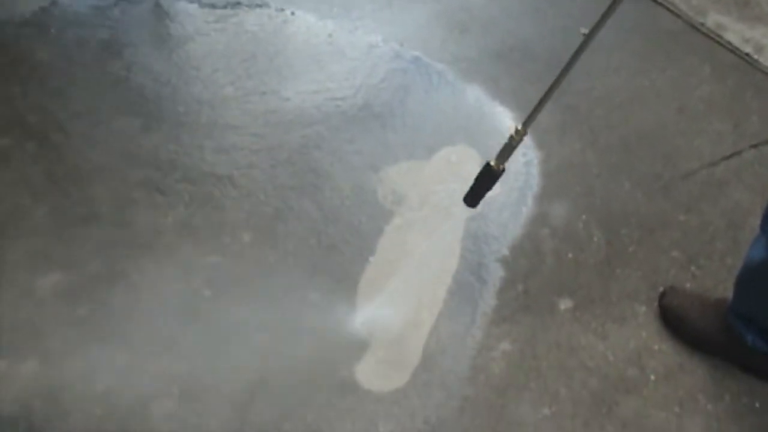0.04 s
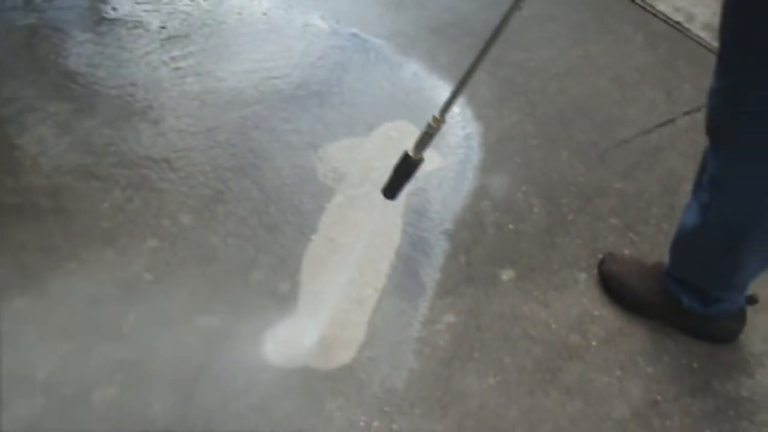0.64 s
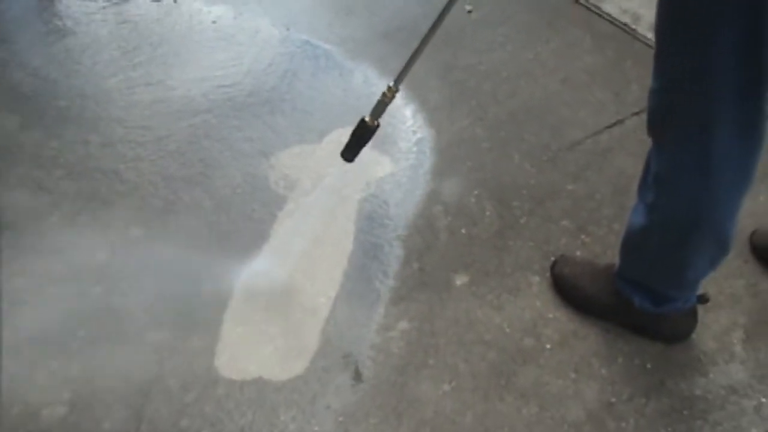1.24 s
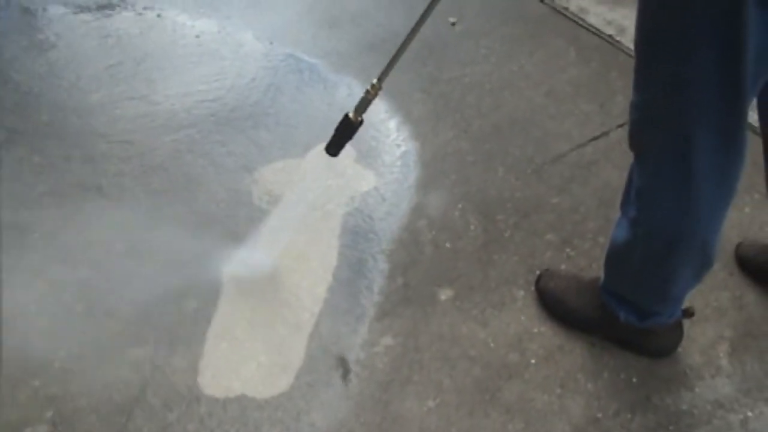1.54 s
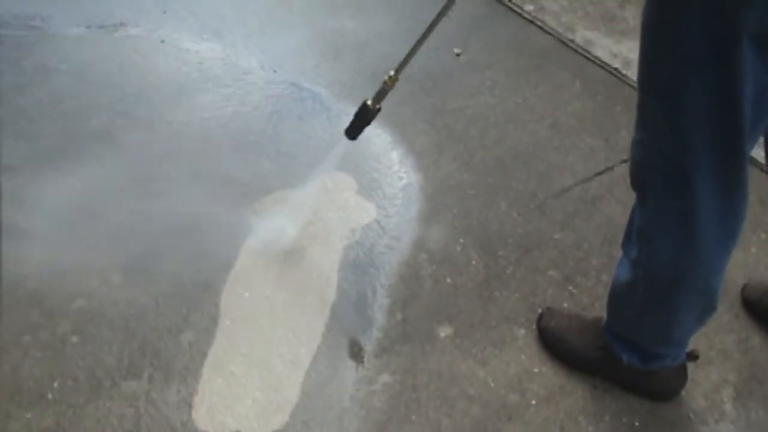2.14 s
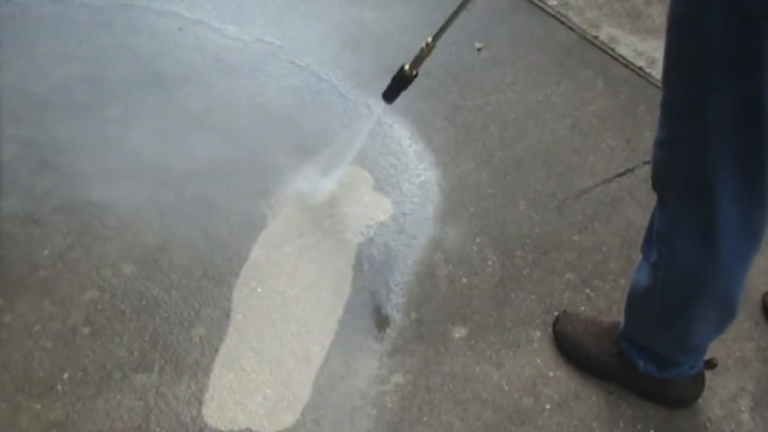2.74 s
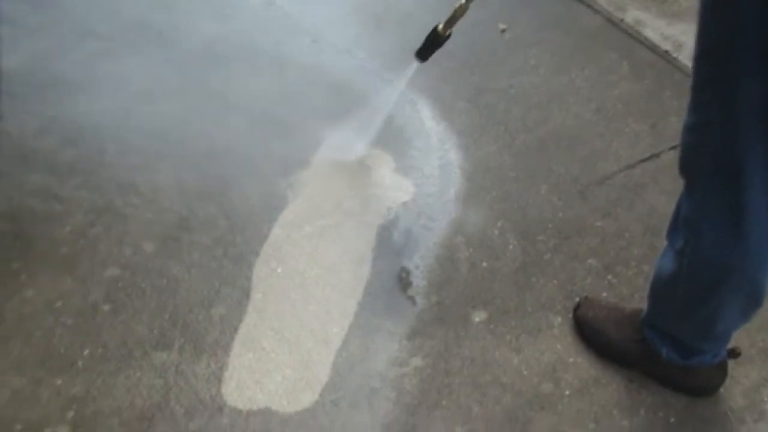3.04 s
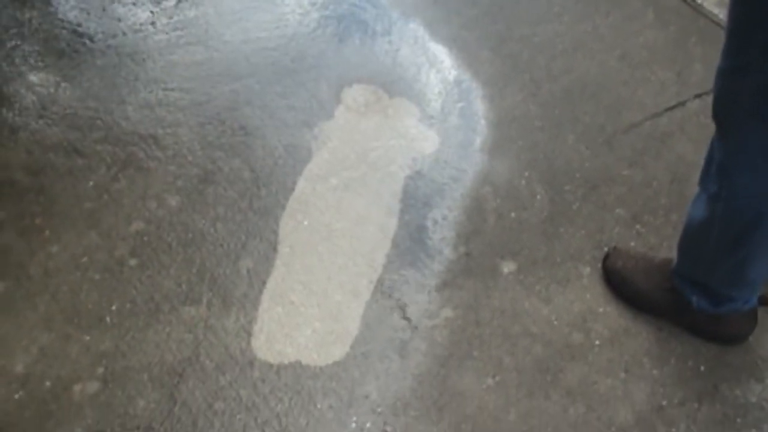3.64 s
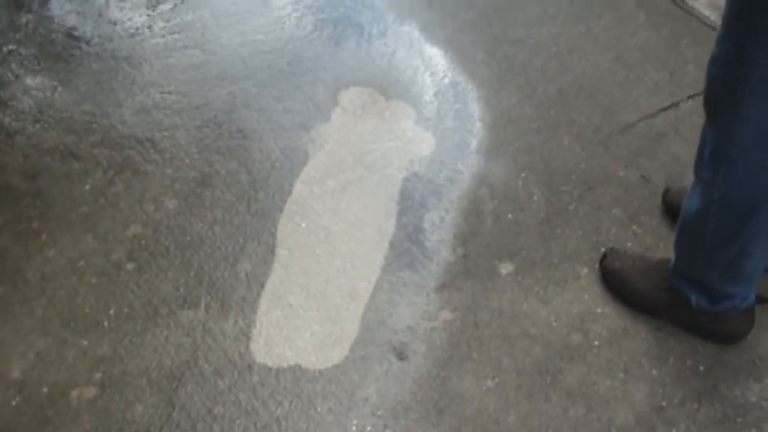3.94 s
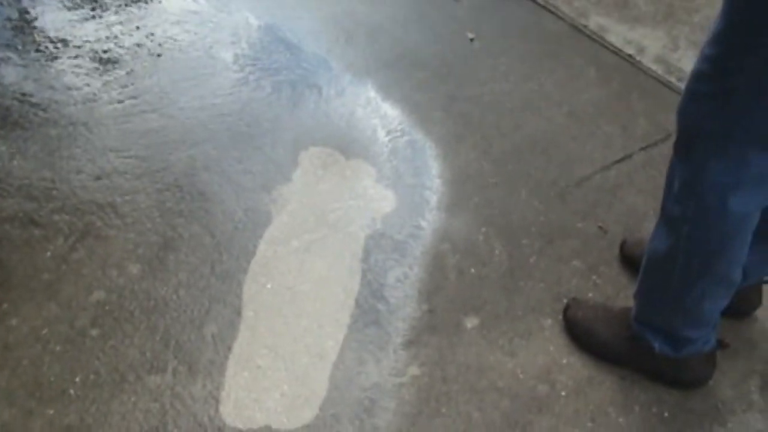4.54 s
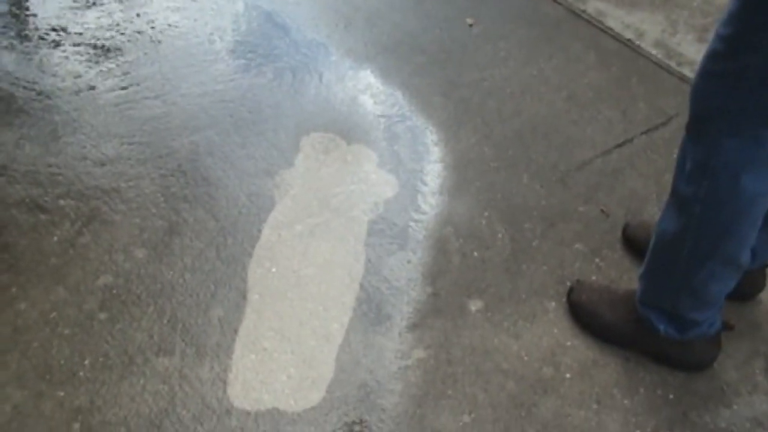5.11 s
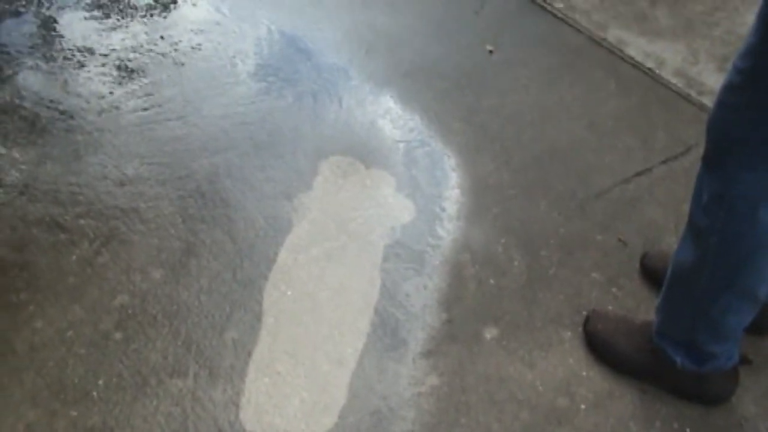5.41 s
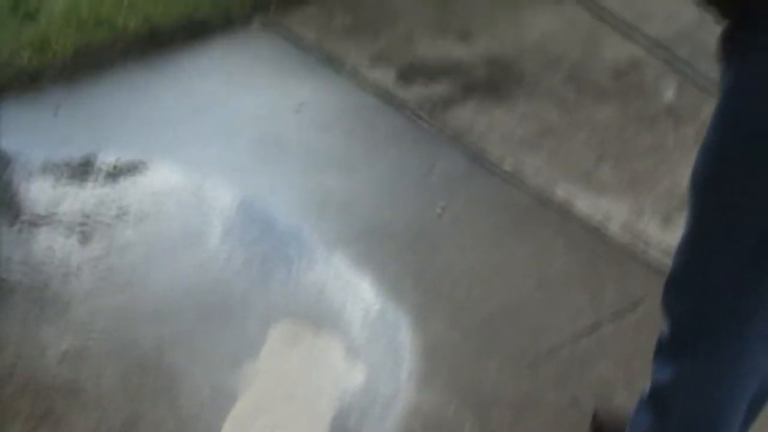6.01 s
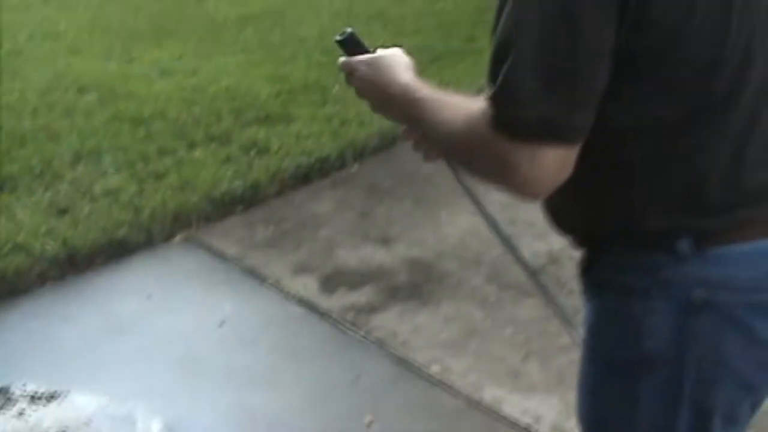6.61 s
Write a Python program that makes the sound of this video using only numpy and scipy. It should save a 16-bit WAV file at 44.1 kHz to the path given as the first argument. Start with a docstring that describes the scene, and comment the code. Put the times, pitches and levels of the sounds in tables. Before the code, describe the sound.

A pressure washer hisses loudly on concrete, then cuts off, leaving a quiet, low engine idle that slowly grows louder.

```python
"""A concrete driveway, blasted by a pressure washer at arm's length. Bright nozzle hiss throbs with the
pump over the spatter and drumming of drops; the slab's reflection sweeps the colour as the lance lifts.
The trigger is let go and the jet stops dead, leaving a faint ringing. Some way off the unloaded
single-cylinder engine hunts, beating against a steady drone. It swells as the automatic gain recovers
and the microphone turns towards it. A faint high whine, probably the camera's own, lies underneath."""
import sys
import numpy as np
from scipy import signal
from scipy.fft import rfft, irfft, next_fast_len
from scipy.io import wavfile
from scipy.ndimage import uniform_filter1d, map_coordinates

SR = 44100
rng = np.random.default_rng(int(sys.argv[2]) if len(sys.argv) > 2 else 0)


def to_wav(s):
    """Save 16-bit WAV."""
    ch = np.atleast_2d(s).T  # columns
    pcm = np.round(np.clip(ch, -1, 1) * 32767)  # PCM
    wavfile.write(sys.argv[1], SR, pcm.astype(np.int16))


N = 302967
TIME = np.arange(N) / SR
RELEASE_S = 3.266   # trigger let go
SINCE_RELEASE_S = np.maximum(TIME - RELEASE_S, 0)
LOADED_HZ, IDLE_HZ = 29.05, 30.4   # engine firing rates
LATE_RISE_DB = 2 * np.maximum(TIME - 4.55, 0)

# Stereo image of the spray. Each row: frequency in Hz, left-right correlation.
SPRAY_CORRELATION = [(60, 0.69), (150, 0.39), (380, 0.67), (700, 0.43), (1300, 0.77), (2000, 0.74),
                     (2800, 0.95), (4400, 0.99), (6500, 0.94), (9500, 1), (12300, 0.98), (14200, 0.74)]
# Balance of the spray. Each row: frequency in Hz, left minus right in dB.
SPRAY_PAN = [(180, -1.8), (400, -0.5), (850, -3), (2000, -1.3), (2800, -0.5), (4200, 0), (6200, -3.5),
             (9000, 0), (13400, -0.9), (15000, -3)]
# Stereo image of clatter and lingering hiss. Each row: frequency in Hz, left-right correlation.
FAR_CORRELATION = [(100, 0.92), (300, 0.88), (640, 0.86), (1400, 0.72), (3100, 0.76), (6800, .63),
                   (15000, .15)]


def jet(pump_hz=42.94, wander_hz=1.85, shutoff_s=.0038):
    """Hiss, spatter and drumming pulse with the pump's pressure until the valve shuts."""
    # The lance is drawn back and up. Each row: time in seconds, lift from 0 (lowest) to 1 (highest).
    lance_path = [(0, .45), (.3, .12), (.55, 0), (.8, .07), (1.3, .47), (1.6, .61), (2.2, .76), (2.55, .9),
                  (3.25, 1)]
    lift = in_time(lance_path)
    stroke_rad = 2 * np.pi * np.cumsum(pump_hz + wander_hz * drift(4.3)) / SR
    pressure = np.sin(stroke_rad) * (1 + .23 * drift(4.7))
    hiss = nozzle_hiss(stroke_rad, pressure, lift)
    impact = from_db(.9 * pressure + .6 * drift(59.3))
    valve = np.exp(-SINCE_RELEASE_S / shutoff_s)
    return valve * (hiss + spatter(impact, lift) + drumming(impact, pressure, lift))


def nozzle_hiss(stroke_rad, pressure, lift, level_db=-15.5, lift_loss_db=1.76):
    """Bright noise from the nozzle, throbbing at the pump rate and its double."""
    # Hiss spectrum. Each row: frequency in Hz, relative density in dB.
    spectrum = [(2500, -35.5), (3800, -14), (4450, -5.5), (5300, -4), (6600, -3), (8300, -3.3), (9500, -1),
                (10800, 1.3), (12000, -2), (13200, -3.5), (14300, -5.5), (15700, -7.5)]
    throb_db = 1.01 * pressure + .7 * np.sin(2 * stroke_rad) + .5 * drift(150)
    hiss = coloured(white(), spectrum, SPRAY_CORRELATION, SPRAY_PAN)
    hiss *= from_db(level_db - lift_loss_db * lift + throb_db)
    return slab_reflection(hiss, lift, detour_m=.178, lift_detour_m=.031, shares=(.4, .045))


def spatter(impact, lift, level_db=-28, lift_loss_db=2.5):
    """A dense rain of drops hits the concrete."""
    # Spatter spectrum. Each row: frequency in Hz, relative density in dB.
    spectrum = [(20, -14), (40, -6), (75, -6.5), (160, -4.5), (280, -4), (700, 0.9), (1150, 1.4),
                (1550, 0.8), (2050, 0.5), (2700, 1.9), (3300, -0.1), (4300, -2), (6500, -10)]
    hits = coloured(drops(per_s=14000), spectrum, SPRAY_CORRELATION, SPRAY_PAN)
    hits *= from_db(level_db - lift_loss_db * lift) * impact
    return slab_reflection(hits, lift, detour_m=.173, lift_detour_m=.063, shares=(.11, .39))


def drumming(impact, pressure, lift, note_hz=374, level_db=-35, lift_loss_db=11.5, thump_db=-55):
    """The biggest slugs of water drum a hollow note on the slab; each pump stroke thumps it."""
    blows = resonate(stereo(*drops(per_s=3500), .87), note_hz, width_hz=170)
    note = unit_rms(resonate(blows, note_hz, width_hz=400))
    thump = from_db(thump_db + 2 * drift(10)) * pressure
    return from_db(level_db - lift_loss_db * lift ** 2) * impact * note + thump


def drops(per_s):
    """Two streams of impacts, random in time and size."""
    return (rng.random((2, N)) < per_s / SR) * white()


def slab_reflection(x, lift, detour_m, lift_detour_m, shares, sound_m_per_s=343):
    """Add the echo off the concrete; shares gives its strength at lowest and highest lift."""
    delay_samples = (detour_m + lift_detour_m * lift) / sound_m_per_s * SR
    share = np.interp(lift, [0, 1], shares)
    echo = np.array([map_coordinates(side, [np.arange(N) - delay_samples], order=3) for side in x])
    return (x + share * echo) / np.sqrt(1 + share ** 2)


def engine():
    """Exhaust and clatter follow one crank; both grow as the microphone turns towards them."""
    speed_hz, throttle = governor()
    load = np.exp(-SINCE_RELEASE_S / .2)
    firing_rad = 2 * np.pi * np.cumsum(speed_hz + .044 * drift(11.2)) / SR
    low = panned(exhaust(firing_rad, speed_hz, throttle, load), pan_db=1.5)
    return from_db(LATE_RISE_DB) * (low + clatter(firing_rad, throttle, load))


def governor(pickup_s=.19, lag_s=.1, half_open_s=.16):
    """Firing rate in Hz and throttle opening: each blip lifts the speed, then it coasts down."""
    # Throttle blips. Each row: start in seconds, swing either side of idle in Hz.
    blips = [(3.42, 1.25), (4.0, 1.05), (4.68, .7), (5.33, .6), (6.08, .55), (6.82, .55)]
    speeds = [(RELEASE_S, LOADED_HZ)]
    for start_s, swing_hz in blips:
        speeds += [(start_s, IDLE_HZ - swing_hz), (start_s + pickup_s, IDLE_HZ + swing_hz)]
    throttle = sum(np.exp(-((TIME - start_s - lag_s) / half_open_s) ** 2) for start_s, _ in blips)
    return in_time(speeds), throttle


def exhaust(firing_rad, speed_hz, throttle, load, puff_db=-56.5, rumble_db=-60.5, boom_order=4):
    """One uneven puff per firing, over a low rumble; the muffler booms more as speed rises."""
    # Exhaust harmonics. Each row: multiple of the firing rate, relative level in dB.
    harmonics = [(1, -15), (2, -3.5), (3, -9), (5, -5), (6, -4.5), (7, -7.5), (8, -11), (9, -19), (10, -15),
                 (11, -15), (12, -13), (13, -15), (16, -7.5), (18, -17), (20, -17)]
    smear_rad = .35   # the muffler delays the higher orders
    puffs = sum(from_db(db) * (1 + .22 * drift(10)) * np.cos(k * firing_rad - smear_rad * k * k)
                for k, db in harmonics)
    puffs = from_db(puff_db + 2.5 * throttle + .71 * drift(25)) * unit_rms(puffs)
    choke_db = 5 * np.maximum(throttle, load)
    boom_db = -55.5 + 4 * (speed_hz - IDLE_HZ) - choke_db
    boom = from_db(boom_db) * unit_rms(np.cos(boom_order * firing_rad - smear_rad * boom_order ** 2))
    rumble = from_db(rumble_db) * noise_band(stereo(*white(), .83), hz=99, width_hz=143)
    return puffs + boom + rumble


def clatter(firing_rad, throttle, load, level_db=-53, load_db=4.5):
    """Valves and fan clatter in step with the crank, and engine parts sing."""
    # Clatter spectrum. Each row: frequency in Hz, relative density in dB.
    spectrum = [(130, -7.5), (260, -4.5), (350, -3), (450, -4), (720, -4), (1050, -6), (1450, -6),
                (2000, -9), (2500, -10), (2900, -12.5), (4100, -13.5), (5000, -16.5), (6300, -24.5),
                (9000, -30), (15700, -39.5)]
    # Clatter balance. Each row: frequency in Hz, left minus right in dB.
    balance = [(200, 1), (900, 0), (1700, -4.6), (3300, -5.5), (5000, -4.8), (11000, -0.5)]
    # Casing resonances. Each row: frequency in Hz, width in Hz, level in dB relative to the clatter.
    casing_modes = [(2243, 120, -14.5), (3890, 380, -21.5)]
    knock_db = -.35 * (np.cos(firing_rad) + np.cos(2 * firing_rad))
    knock = from_db(knock_db + .52 * drift(40) + .5 * throttle)
    rattle = coloured(white(), spectrum, FAR_CORRELATION, balance)
    casing = panned(singing(casing_modes), pan_db=-2.5)
    return from_db(level_db + load_db * load) * knock * (rattle + casing)


def yard_echoes(x, t60_s=.48, gap_s=.004, lowpass_hz=7530):
    """Diffuse echoes from house and fence, different at each ear."""
    t = TIME[:SR]
    tail = rng.standard_normal((2, SR)) * from_db(-60 * t / t60_s) * (t > gap_s)
    tail = stereo(*tail, .87)
    tail /= np.sqrt(np.sum(tail ** 2) / 2)
    lowpass = signal.butter(1, lowpass_hz, fs=SR, output="sos")
    return signal.sosfilt(lowpass, signal.fftconvolve(x, tail, axes=1)[:, :N])


def ringing(hiss_db=-58, fade_db_per_s=8.5):
    """Soft hiss with thin high tones, dying slowly once the jet stops."""
    # Lingering hiss. Each row: frequency in Hz, relative density in dB.
    spectrum = [(3000, -8), (5500, -2), (7000, 1), (9500, 0.8), (11500, 0), (12400, -5.5), (14000, -3),
                (15700, -3)]
    # Thin tones. Each row: frequency in Hz, width in Hz, level in dB.
    tones = [(2550, 200, -66), (8470, 45, -73), (9000, 130, -72), (10480, 120, -76), (10880, 130, -71.5),
             (11660, 150, -74), (12960, 170, -76.5), (14980, 150, -79)]
    hiss = from_db(hiss_db) * coloured(white(), spectrum, FAR_CORRELATION)
    return (hiss + singing(tones)) * from_db(-fade_db_per_s * SINCE_RELEASE_S)


def drone(base_hz=29.01, roughness=.23):
    """A steady low drone, like another motor farther off."""
    # Drone partials. Each row: multiple of base_hz, level in dB.
    partials = [(2, -62.5), (4, -69), (5, -66), (6, -70), (10, -72), (12, -67.5), (15, -77)]
    phase_rad = 2 * np.pi * base_hz * TIME
    return sum(from_db(db) * unit_rms((1 + roughness * drift(6)) * np.cos(k * phase_rad))
               for k, db in partials)


def thin_whine(hz=14235, level_db=-83.5, left_lead_rad=2.5):
    """A faint, thin whine of steady pitch, probably the camera's own; it dips, then rises."""
    tone = unit_rms(np.sin(2 * np.pi * hz * TIME + np.array([[left_lead_rad], [0]])))
    return from_db(level_db + 4.5 * np.exp(-SINCE_RELEASE_S / .2) + LATE_RISE_DB) * tone


def from_db(db):
    """Decibels to gain."""
    return 10 ** (np.asarray(db) / 20)


def unit_rms(x):
    """Scale to unit power."""
    return x / np.sqrt(np.mean(x ** 2) + 1e-20)


def in_time(rows):
    """A curve of (seconds, value) rows at every sample."""
    return np.interp(TIME, *np.transpose(rows))


def at_hz(rows, hz):
    """Interpolate (Hz, value) rows on a log-frequency axis."""
    row_hz, value = np.transpose(rows)
    return np.interp(np.log(hz + 1e-9), np.log(row_hz), value)


def white():
    """Two independent white noises."""
    return rng.standard_normal((2, N))


def drift(rate_hz, hop=40):
    """Random wander, rms 1, mostly slower than rate_hz."""
    pole = np.exp(-2 * np.pi * rate_hz * hop / SR)
    noise = rng.standard_normal(N // hop + 2002)
    slow = signal.lfilter([1], [1, -2 * pole, pole * pole], noise)[2000:]
    return np.interp(np.arange(N) / hop, np.arange(len(slow)), unit_rms(slow))


def stereo(mid, side, correlation):
    """Left and right with a given correlation."""
    return np.sqrt(1 + correlation) * mid + np.sqrt(1 - correlation) * side * np.array([[1], [-1]])


def panned(x, pan_db):
    """Place a sound by its left minus right level."""
    return x * from_db(pan_db * np.array([[.5], [-.5]]))


def coloured(source, spectrum, correlation, balance=None):
    """Shape two white sources into one stereo sound, rms 1."""
    size = next_fast_len(N)
    hz = np.arange(size // 2 + 1) * SR / size
    bins = stereo(*rfft(source, size), at_hz(correlation, hz)) * from_db(at_hz(spectrum, hz))
    if balance:
        bins = panned(bins, at_hz(balance, hz))
    return unit_rms(irfft(bins, size)[:, :N])


def resonate(x, hz, width_hz):
    """One resonance, peak gain 1."""
    r = np.exp(-np.pi * width_hz / SR)
    feedback = [1, -2 * r * np.cos(2 * np.pi * hz / SR), r * r]
    return signal.lfilter(np.array([1, 0, -1]) * (1 - r * r) / 2, feedback, x)


def noise_band(noise, hz, width_hz):
    """Noise through the same resonance twice, rms 1."""
    return unit_rms(resonate(resonate(noise, hz, width_hz), hz, width_hz))


def singing(modes):
    """Narrow resonances kept going by noise."""
    noise = stereo(*white(), .97)
    return sum(from_db(db) * noise_band(noise, hz, width_hz) for hz, width_hz, db in modes)


def gain_control(x, threshold_db=-17.5, release_db_per_s=4.5, strength=.85):
    """Boost below the threshold: the gain drops at once for a loud sound, then creeps back."""
    level_db = 10 * np.log10(uniform_filter1d(np.mean(x ** 2, axis=0), size=4096) + 1e-12)
    held_db = np.maximum.accumulate(level_db + release_db_per_s * TIME) - release_db_per_s * TIME
    return x * from_db(strength * np.maximum(threshold_db - held_db, 0))


def scene():
    """The jet close by, the engine farther off."""
    spray = jet()
    return spray + from_db(-17) * yard_echoes(spray) + ringing() + engine() + drone() + thin_whine()


def record(dry):
    """Automatic gain, then a steep low-pass at 15.9 kHz."""
    lowpass = signal.ellip(12, .1, 90, 15900, fs=SR, output="sos")
    return signal.sosfilt(lowpass, gain_control(dry))


dry = scene()
out = record(dry)
to_wav(out)
```